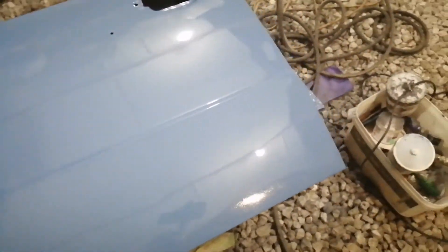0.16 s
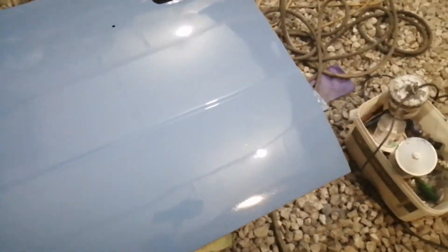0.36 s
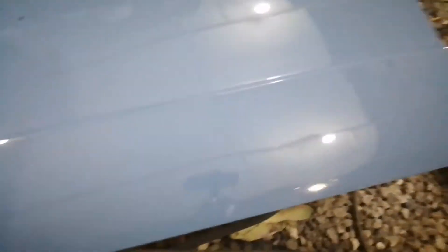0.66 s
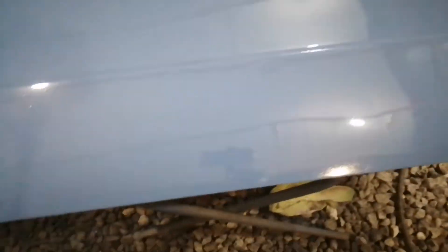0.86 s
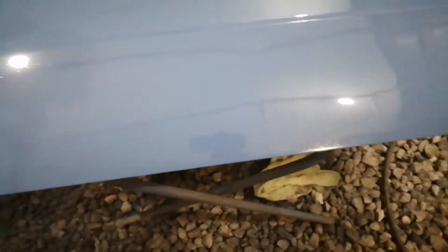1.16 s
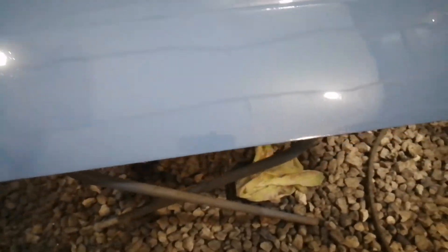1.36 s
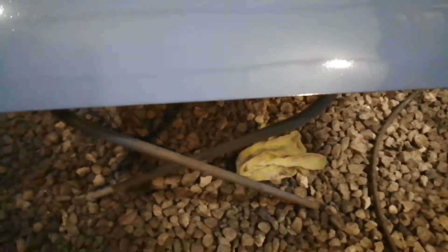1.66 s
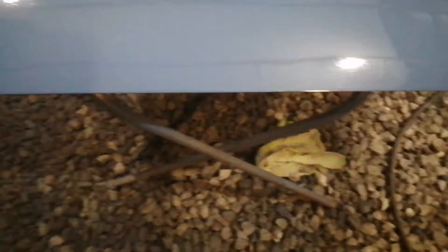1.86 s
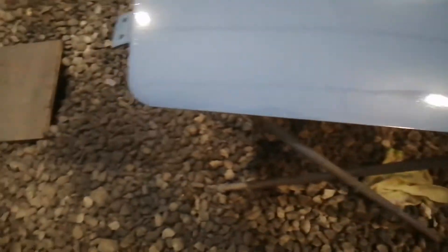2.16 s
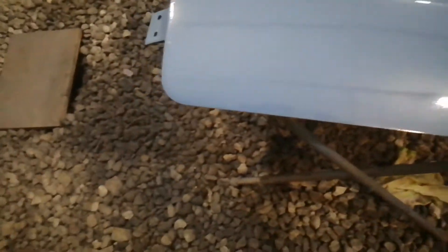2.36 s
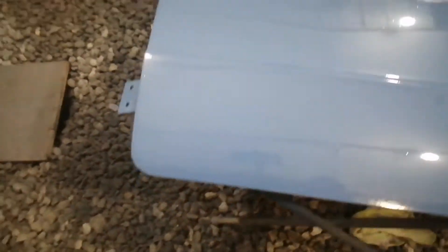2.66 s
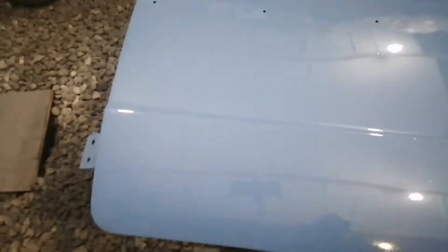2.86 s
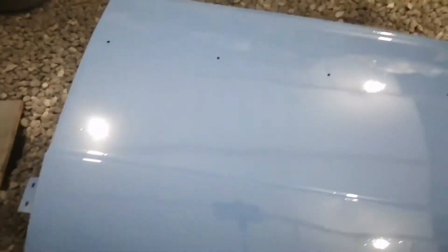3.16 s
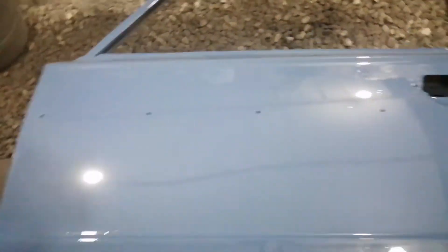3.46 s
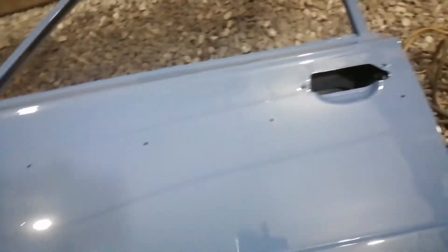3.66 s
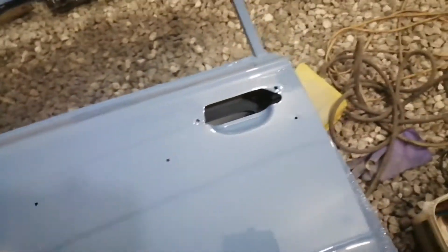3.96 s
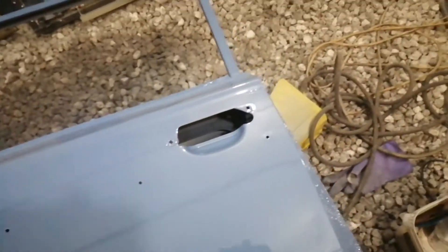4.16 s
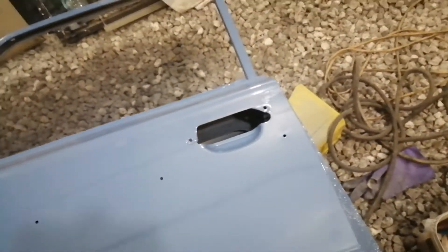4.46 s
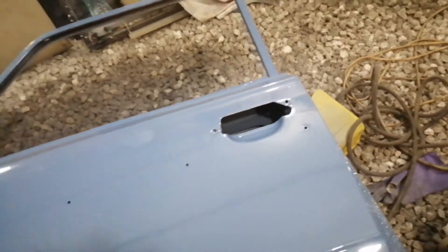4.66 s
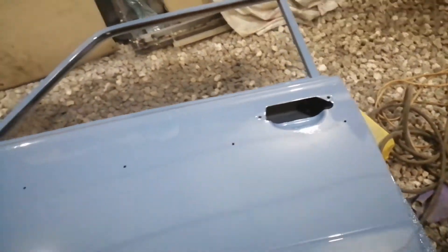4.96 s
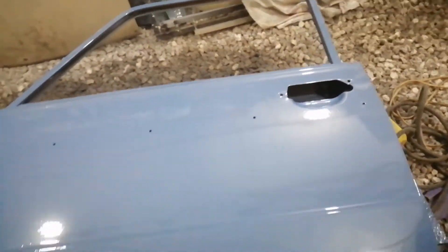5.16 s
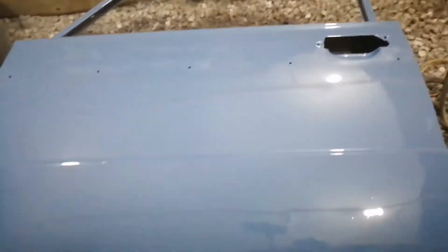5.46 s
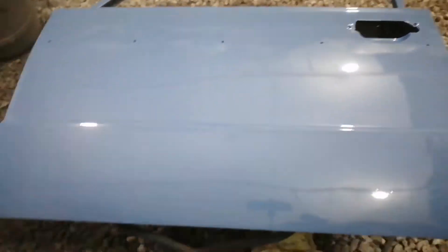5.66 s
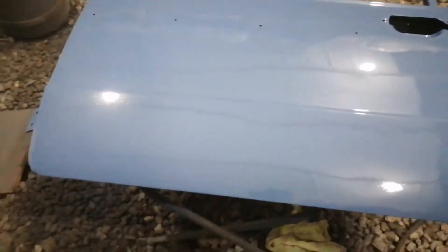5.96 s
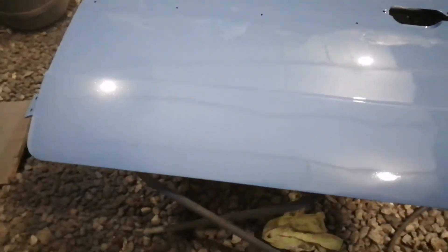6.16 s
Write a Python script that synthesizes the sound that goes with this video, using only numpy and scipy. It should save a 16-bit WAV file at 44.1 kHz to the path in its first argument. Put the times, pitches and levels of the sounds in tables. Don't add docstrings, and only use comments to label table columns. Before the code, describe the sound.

From 0 to about 6.3 seconds a piston air compressor runs continuously at one speed, a few metres from a hand-held stereo microphone in a gravel-floored garage. The body of the sound is a low, buzzing drone, strongest around 130 and 210 to 300 hertz, with a rapid throb of about sixteen and a half strokes each second. Each stroke brings a dull intake thump, a metallic head knock and a small fluttering puff of valve hiss, with very faint high ticks. Rough turbulent air and motor hum fill between. The rumble is slightly more open near 0.6 s, more shaded around 2.5 s, and opens again from about 3.8 to 5.1 s. Throughout, tones swell, fade and lean left or right as the microphone moves. There is no start, stop, spray burst or speech.

```python
import sys
import numpy as np
from scipy import signal
from scipy.fft import rfft, irfft, next_fast_len
from scipy.io import wavfile
from scipy.ndimage import uniform_filter1d, map_coordinates

SR = 44100
rng = np.random.default_rng(int(sys.argv[2]) if len(sys.argv) > 2 else 0)


def elevation(decibels):
    levels = np.asarray(decibels, float)
    return 10 ** (levels / 20)


def int16_out(signal):
    q = np.round(np.clip(np.atleast_2d(signal).T, -1, 1) * 32767)
    wavfile.write(sys.argv[1], SR, q.astype(np.int16))


N = 278700

# [multiple of the crank rate, rms level/dB]
LOW_ORDERS = [(1, -66), (2, -67.5), (3, -60.5), (4, -57.5), (5, -49), (6, -53), (7, -52), (8, -41),
              (9, -65), (10, -53.5), (11, -54), (12, -50.5), (13, -41), (14, -35.5), (15, -32.5), (16, -33),
              (17, -42.5), (18, -43), (19, -54.5), (20, -58.5), (21, -59.5), (22, -71), (23, -62),
              (24, -61), (25, -45.5), (26, -58.5), (27, -48), (28, -48.5), (29, -55.5), (30, -63.5)]
# [f/Hz, rms level/dB]
HIGH_ORDERS = [(500, -52), (600, -63.5), (660, -59.5), (750, -53), (850, -69), (910, -57.5), (1050, -79.5),
               (1280, -62), (1400, -77), (1500, -66.5), (1650, -107)]
# [order, pressure there, change along/m^-1, change across/m^-1, left-right level/dB]
STANDING_WAVES = [(8, -.14, .14, .08, -2.5), (12, 1.16, .13, 2.3, -3), (13, .57, -.38, -.02, -5),
                  (14, .19, -.29, -.1, -3), (15, .01, .56, .82, -4.5), (16, -.27, .58, .41, -5),
                  (17, .83, .47, .69, -2), (18, .23, -.38, .01, -6), (26, .55, -.12, 4, 7),
                  (27, -.42, -1.08, 2.15, 2), (28, -.15, -.9, .43, -6), (36, .018, -.79, .76, 7)]
CROSSING_WAVES = [(-.67, .25, .3), (.56, -.53, .13), (.29, .25, -.53), (-.03, -.04, -.08), (-.25, .16, .54),
                  (-.12, .46, -.58), (.15, .09, .41), (-.34, -.21, -.2), (-.3, .3, 0), (.28, 0, 0),
                  (.44, .8, -.3), (.24, 0, 0)]
# [order, crest rms level/dB, angle at the middle/rad, angle along/(rad/m), angle across/(rad/m)]
CREST_ORDERS = [(4, -52.0, 1.0, 0.45, 0.15), (45, -57.0, 0.6, 0.6, -0.6), (19, -54.3, 1.4, 0.75, 0.9),
                (25, -42.7, 0.0, 1.35, 0.3), (29, -52.4, 1.2, 1.5, 2.25), (30, -53.0, 3.0, -0.15, 2.25),
                (31, -55.2, 1.4, 1.5, 1.65), (32, -46.6, 0.0, -1.35, 0.15), (33, -50.1, 0.8, 0.9, 2.55),
                (34, -54.2, 3.0, -2.55, 0.3), (35, -51.5, 2.0, -0.75, 2.7), (37, -53.9, 1.6, 0.6, 0.0),
                (38, -61.0, 2.6, -0.6, 1.5), (39, -51.6, 1.4, 0.3, 0.6), (40, -53.5, 0.6, -1.5, 0.0),
                (41, -57.9, 3.0, 1.5, 1.05), (42, -54.5, 0.2, 1.8, 1.8), (43, -54.7, 2.4, 0.9, 0.6),
                (44, -49.3, 1.6, 0.6, 0.0), (46, -52.4, 1.8, 0.45, 0.45), (47, -56.6, 1.6, -1.05, 2.4),
                (48, -50.4, 1.6, -0.6, 0.45), (49, -53.9, 1.4, -0.15, 0.9), (51, -57.1, 1.2, -0.3, 1.35),
                (52, -65.2, 2.8, 0.75, 1.5), (55, -53.5, 0.8, -1.35, 0.6), (56, -58.8, 0.8, 1.05, 2.85),
                (58, -59.4, 2.2, 0.45, 0.75), (76, -62.7, 1.0, 2.4, 1.5), (80, -60.6, 1.8, 0.6, 0.0)]
# [f/Hz, rms level/dB]
MOTOR_TONES = [(74.7, -85), (99, -70), (203, -50.5)]
# [f/Hz, level/dB per Hz]
RUMBLE_COLOUR = [(20, -120), (25, -39), (60, -15), (110, -7.5), (165, -4), (205, 0), (280, -4.5),
                 (350, -9.5), (450, -5.5), (800, -9), (1300, -13.5), (1800, -16), (2400, -19.5),
                 (3000, -120)]
# [f/Hz, level/dB per Hz]
AIR_COLOUR = [(900, -37), (1800, -32.5), (2700, -15), (3700, -17.5), (4100, -21.5), (5000, -14.5),
              (6000, -13.5), (7200, -11.5), (7900, -23.5), (10200, -27), (10700, -31), (13000, -34),
              (15000, -32), (16500, -36)]
# [f/Hz, width/Hz, level over the air/dB]
REED_RINGS = [(3340, 120, 8.5), (5200, 62, 6.5), (5750, 64, 7.5), (6370, 263, 8.5), (6920, 257, 9.5)]
# [f/Hz, level over the valve air/dB]
JET_COLOUR = [(2000, -32), (2900, -27), (3350, -6), (3900, -40), (4600, -3.5), (7500, 1), (8200, -45),
              (11000, -25)]
# [f/Hz, level over the valve air/dB]
SNAP_COLOUR = [(3000, -30), (4400, -8), (5500, 3), (6500, 5), (7300, 4), (7800, -9), (8200, -20)]
# [f/Hz, likeness 0-1]
PORT_LIKENESS = [(60, 0.7), (300, 0.32), (700, 0.48), (1400, 0.4), (3000, 0), (8000, 0)]
# [f/Hz, level/dB]
PORT_LEAN = [(40, -1), (200, -2.5), (500, -3), (1200, 1.7), (2500, 1.5), (4400, -1), (5800, -4.5),
             (7000, 6.5), (9000, 2), (14000, -4)]
# [t/s, along the panel/m, across it/m]
MIC_PATH = [(0.0, -0.97, 0.53), (0.4, -0.71, 0.75), (0.8, -0.94, 0.43), (1.3, -1.12, -0.11),
            (1.8, -1.32, -0.01), (2.3, -1.15, -0.56), (2.8, -1.03, -0.4), (3.2, -0.53, -0.24),
            (3.6, 0.42, -0.18), (4.0, 0.85, 0.17), (4.5, 0.93, 0.09), (4.9, 0.66, 0.25), (5.3, -0.24, 0.66),
            (5.7, -0.78, 0.77), (6.0, -0.92, 0.39), (6.32, -0.89, 0.44)]
# [t/s, level/dB]
PANEL_VIEW = [
    (0.0, -47.5),
    (0.56, -42.5),
    (1.05, -49.5),
    (1.62, -46.5),
    (2.53, -51.5),
    (3.54, -49.5),
    (3.84, -47),
    (5.09, -46),
    (5.1, -47.5),
    (6.32, -49),
]

CRANK_HZ = 16.51
BELT_HZ = 170.2
PORT_LAG_S = 0.000302
PORTS_M = (-0.05, -0.2)
SIDES = np.array([[.5], [-.5]])

TURN_LAG_MS = (0.34, -0.026, -0.061)
KNOCK_DB, FAR_DB = (-2, 0.3, 3), (2.5, 1.5, -1.5)
HISS_DB, RUMBLE_DB = (-35, 0.37, 0.5), (-41.5, -0.1, -0.5)
NEARER_TURNS = (0, -.015, 0)
BELT_CREST_RAD = (2.18, .32, .86)


def unit(x):
    return x / np.sqrt(np.mean(x ** 2) + 1e-20)


def along(points, hz):
    f, v = np.transpose(points)
    return np.interp(np.log(hz + 1), np.log(f + 1), v)


def curves(rows):
    s, *cols = np.transpose(rows)
    return [np.interp(np.arange(N) / SR, s, c) for c in cols]


def placed(rule, sides=0):
    x, y = curves(MIC_PATH)
    return rule[0] + rule[1] * (x + sides * PORTS_M[0]) + rule[2] * (y + sides * PORTS_M[1])


def wobble(rate, count):
    knots = rng.standard_normal((count, int(N * rate / SR) + 4))
    coarse = np.arange(0, N + 256, 256)
    return [np.interp(np.arange(N), coarse, map_coordinates(k, [coarse * rate / SR + 1])) for k in knots]


def filtered(x, response):
    m = next_fast_len(N + SR // 2)
    return irfft(rfft(x, m) * response(np.fft.rfftfreq(m, 1 / SR)), m)[..., :N]


def ports(gain):
    def split(hz):
        turn = np.arccos(np.clip(along(PORT_LIKENESS, hz), 0, 1)) / 2
        return gain(hz) * np.array([np.cos(turn), np.sin(turn)])

    def lag_and_lean(hz):
        return np.exp(-2j * np.pi * hz * PORT_LAG_S * SIDES) * elevation(SIDES * along(PORT_LEAN, hz))

    same, other = filtered(rng.standard_normal((2, N)), split)
    return unit(filtered(np.array([same + other, same - other]), lag_and_lean))


def strokes(start, rise_s, decay_s, scatter_db, hold_s=0):
    turns = np.arange(N) / SR * CRANK_HZ + 1 - start - placed(NEARER_TURNS)
    since = turns % 1 / CRANK_HZ
    size = elevation(scatter_db * rng.standard_normal(int(turns[-1]) + 2))[turns.astype(int)]
    return size * (1 - np.exp(-since / rise_s)) * np.exp(-np.maximum(since - hold_s, 0) / decay_s)


def patchy(x, patchy_db):
    z = signal.stft(x, nperseg=256)[2]
    patches = uniform_filter1d(rng.standard_normal(z.shape[1:]), size=4, axis=0)
    patches = uniform_filter1d(patches, size=8, axis=1)
    return signal.istft(z * elevation(patchy_db * unit(patches)), nperseg=256)[1][:, :N]


def tone(hz, db, lean_db, phase, lag_ms, apart=0):
    t = np.arange(N) / SR - SIDES * lag_ms / 1000
    return np.sqrt(2) * elevation(db + SIDES * lean_db) * np.cos(2 * np.pi * hz * t + phase + SIDES * apart)


def roaming(k, db, lag_ms):
    swell, side, drift, apart = wobble(1.242, count=4)
    hz = k * CRANK_HZ
    spread = np.clip(hz / 500, .55, 1)
    lean_db = along(PORT_LEAN, hz) + 4 * spread * side
    phase = 2 * np.pi * rng.random() + spread * drift
    return tone(hz, db + 3 * spread * swell, lean_db, phase, lag_ms, 1.15 * spread * apart)


def stood(hz, db, lean_db, phase, here, passing=0.23):
    def wave(shift):
        return tone(hz, db, lean_db, phase + shift, lag_ms=0.14)
    return here * wave(0) + passing * wave(np.pi / 2)


def standing_orders():
    return [round(row[0]) for row in STANDING_WAVES + CREST_ORDERS]


def rumble():
    breath = 1 + 0.3 * strokes(0.78, rise_s=0.0078, decay_s=0.047, scatter_db=4.5)
    air = ports(lambda hz: elevation(along(RUMBLE_COLOUR, hz)))
    top = filtered(air, lambda hz: np.exp(-(np.log((hz + 1) / 1200) / 0.55) ** 2))
    view_db, = curves(PANEL_VIEW)
    shade = elevation(1.04 * (view_db - view_db.mean())) - 1
    level = elevation(placed(RUMBLE_DB) + 1.6 * wobble(3.126, count=1)[0])
    return level * breath * (air + shade * top)


def motor():
    lag_ms = placed(TURN_LAG_MS)
    swells, drifts = wobble(2.25, count=3), wobble(2.5, count=3)
    return sum(tone(hz, db + 3 * swell, -1.7, 1.96 * drift, lag_ms)
               for (hz, db), swell, drift in zip(MOTOR_TONES, swells, drifts))


def tick():
    seat = strokes(.56, rise_s=.0007, decay_s=.005, scatter_db=2)
    ring = 0.28 * strokes(.56, rise_s=.004, decay_s=.02, scatter_db=1, hold_s=.022)
    noise = ports(lambda hz: 1 / (1 + ((hz - 13900) / 180) ** 2))
    return elevation(-53.0 + np.array([[-2.5], [2.5]])) * (0.06 + seat + ring) * noise


def piston():
    held, lag_ms = standing_orders(), placed(TURN_LAG_MS)
    return sum(roaming(round(k), db, lag_ms) for k, db in LOW_ORDERS[:24] if round(k) not in held)


def head():
    near_db, far_db, lag_ms = placed(KNOCK_DB), placed(FAR_DB), placed(TURN_LAG_MS)
    held = standing_orders()
    weak = np.arange(len(LOW_ORDERS) + 1, 100)
    weak_db = along(HIGH_ORDERS, weak * CRANK_HZ) + 1.9 * rng.standard_normal(len(weak))
    rows = [*LOW_ORDERS[24:], *zip(weak, weak_db)]
    return sum(roaming(round(k), db + (near_db if k < 34 else far_db), lag_ms)
               for k, db in rows if round(k) not in held)


def valves():
    def colour(hz):
        ring = 1 + sum((elevation(db) - 1) / (1 + (2 * (hz - c) / w) ** 2) for c, w, db in REED_RINGS)
        return elevation(along(AIR_COLOUR, hz)) * ring

    jet = strokes(0.855, rise_s=0.0004, decay_s=0.012, scatter_db=.8, hold_s=.026)
    jet = jet * ports(lambda hz: colour(hz) * elevation(along(JET_COLOUR, hz)))
    hits = sum(elevation(db) * strokes(turn, rise_s=.0003, decay_s=.003, scatter_db=2.5)
               for turn, db in [(.855, 0), (.925, -2)])
    snap = hits * ports(lambda hz: colour(hz) * elevation(along(SNAP_COLOUR, hz)))
    snap = elevation([[-5], [0]]) * snap
    cough = elevation(-13.5) * strokes(.87, rise_s=.002, decay_s=.012, scatter_db=2.2, hold_s=.018)
    cough = cough * ports(lambda hz: colour(hz) * np.exp(-((hz - 3300) / 350) ** 2))
    angle = 2 * np.pi * (np.arange(N) / SR * CRANK_HZ - .19) + 0.42 * wobble(22, count=1)[0]
    swell = elevation((2.0 + 0.17 * wobble(5.46, count=1)[0]) * np.cos(angle))
    hiss = swell * ports(colour)
    flutter = elevation(0.71 * np.array(wobble(70, count=2)))
    air = unit(patchy(flutter * (0.92 * jet + 1.9 * snap + cough + hiss), patchy_db=0.99))
    lean_db = -0.36 - 0.18 * np.arange(N) / SR
    return elevation(placed(HISS_DB) + 3.5 + SIDES * lean_db) * air


def standing():
    level = {round(k): db for k, db in LOW_ORDERS}

    def phase(k):
        if k < 20:
            turns = k * 0.13
        elif k < 29:
            turns = k * 0.179
        else:
            turns = rng.random()
        return -2 * np.pi * turns

    out = stood(BELT_HZ, -44, along(PORT_LEAN, BELT_HZ), 0, np.cos(placed(BELT_CREST_RAD, SIDES)))
    for (k, *slopes, lean_db), other in zip(STANDING_WAVES, CROSSING_WAVES):
        k = round(k)
        here, passing = placed(slopes, SIDES), placed(other, SIDES)
        out += stood(k * CRANK_HZ, level.get(k, -50), lean_db, phase(k), here, passing)
    for k, db, *angles in CREST_ORDERS:
        k = round(k)
        hz = k * CRANK_HZ
        out += stood(hz, db, along(PORT_LEAN, hz), phase(k), np.cos(placed(angles, SIDES)))
    return out


def scene():
    return rumble() + motor() + tick() + piston() + head() + valves() + standing()


def top_cut(x):
    return signal.sosfilt(signal.butter(12, 16130, fs=SR, output="sos"), x)


def record(dry):
    fade = [(15000, 0), (15250, 5), (15700, -5), (15760, -80)]  # f/Hz, level/dB
    heard = filtered(dry, lambda hz: elevation(along(fade, hz)))
    return top_cut(heard)


dry = scene()
out = record(dry)
int16_out(out)
```